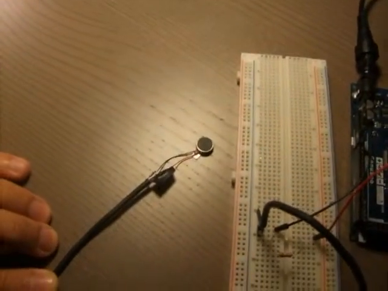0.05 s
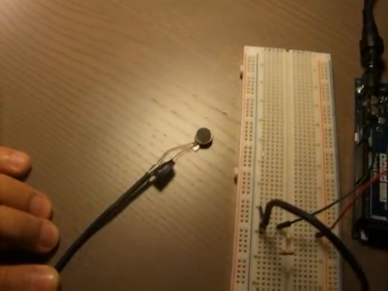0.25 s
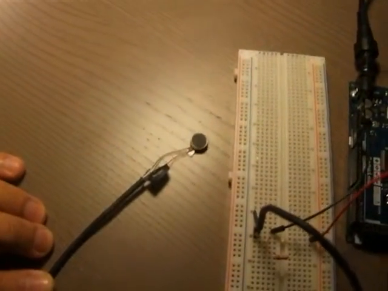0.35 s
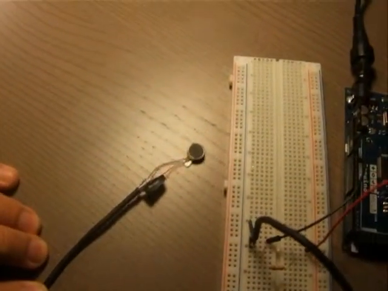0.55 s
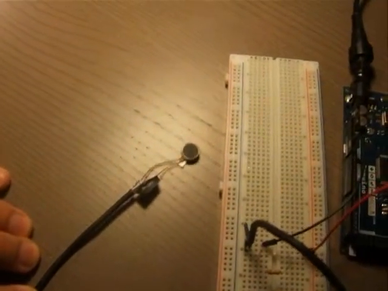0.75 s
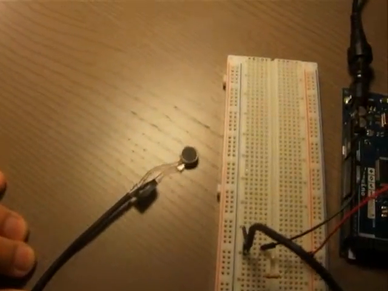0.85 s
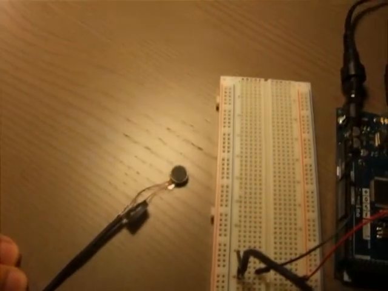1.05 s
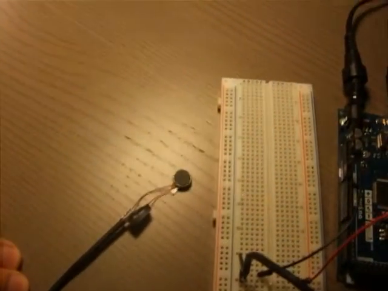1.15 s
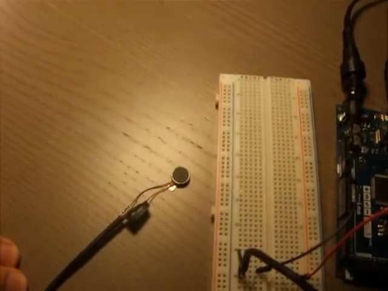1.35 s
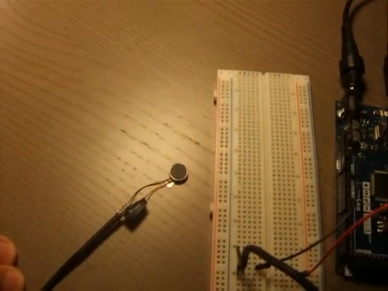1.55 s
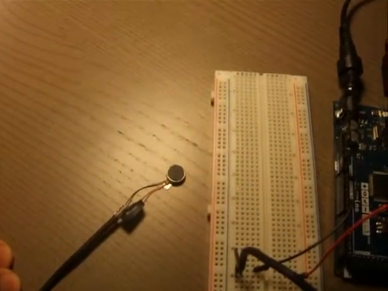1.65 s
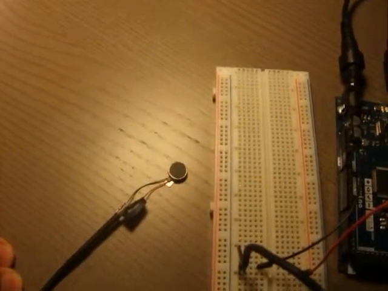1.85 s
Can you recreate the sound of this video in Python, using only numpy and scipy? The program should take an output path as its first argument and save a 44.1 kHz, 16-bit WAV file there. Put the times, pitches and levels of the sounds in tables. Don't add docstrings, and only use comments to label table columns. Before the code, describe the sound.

After a brief moment of gritty room hum, a coin-sized motor chatters hard against wood with sharp irregular clacks and fine scraping, cuts off abruptly, then two tiny stray ticks; close, dull, noisy mono sound.

```python
import sys
import numpy as np
from scipy import signal
from scipy.fft import rfft, irfft
from scipy.io import wavfile
from scipy.ndimage import uniform_filter1d

SR = 44100
rng = np.random.default_rng(int(sys.argv[2]) if len(sys.argv) > 2 else 0)


def waveform_to_disk(signal):
    frames = np.transpose(np.atleast_2d(signal))
    scaled = np.clip(frames, -1, 1) * 32767
    samples = np.round(scaled).astype(np.int16)
    wavfile.write(sys.argv[1], SR, samples)


def volts_from_decibels(level):
    exponent = np.asarray(level, float) / 20
    return 10 ** exponent


N = 83790
LEAD = 220


def over_frequency(freqs, points):
    hz, db = np.array(points).T
    return np.interp(np.log(freqs), np.log(hz), db)


def coloured(points, size):
    freqs = np.fft.rfftfreq(size, 1 / SR) + 1
    spectrum = rfft(rng.standard_normal(size)) * volts_from_decibels(over_frequency(freqs, points))
    noise = irfft(spectrum, size)
    return noise / noise.std()


def walk(rate):
    hold = int(SR / rate)
    steps = np.repeat(rng.standard_normal(N // hold + 1), hold)
    return 1.3 * uniform_filter1d(uniform_filter1d(steps, hold), hold)[:N]


def clicks(times, gains):
    return np.bincount(np.clip((times * SR).astype(int), 0, N - 1), gains, N)


# frequency in Hz, level in dB per Hz.
ROOM_COLOUR = [(25, -12), (60, -4.5), (150, -9.5), (300, -4), (600, -12.5), (1500, -14), (7000, -23.5)]
ROOM_TONE_DB, MAINS_HZ, MAINS_DB = -54.5, 119.4, -61.5


def room(t):
    hum_gain = np.sqrt(2) * volts_from_decibels(MAINS_DB + 1.0 * walk(8))
    hum = hum_gain * np.sin(2 * np.pi * MAINS_HZ * t + 0.6 * walk(10))
    return volts_from_decibels(ROOM_TONE_DB + 1.2 * walk(1)) * coloured(ROOM_COLOUR, N) + hum


# time in seconds, speed in turns per second (Hz), tap level in dB.
ROTOR = [(0.209, 116, -29), (0.299, 119.9, -27.5), (0.424, 125, -28.5), (0.519, 129, -29),
         (0.622, 136.5, -29), (0.7, 151.7, -30.5), (0.83, 156.3, -30.5), (0.94, 161.5, -30),
         (1.04, 174, -31), (1.202, 176.2, -32), (1.234, 171.8, -45), (1.271, 167.9, -44.5)]
SPIN_FADE_S, COAST_S = .05, .045


def rotor_spin(t):
    times, speeds, levels = np.array(ROTOR).T
    speed = np.interp(t, times, speeds)
    turns = np.cumsum(speed * (1 + 0.008 * walk(25))) / SR
    to_nearest_end = np.minimum(t - times[0], times[-1] + COAST_S - t)
    running = np.clip(to_nearest_end / SPIN_FADE_S, 0, 1)
    return speed, turns, running, np.interp(t, times, levels)


# multiple of the turning rate, level in dB at 160 Hz,
# growth with speed as a power.
WHIRR = [
    (1, -59.5, 4),
    (2, -56.5, 1.5),
]
WHIRR_FLUTTER_DB, WHIRR_WOBBLE_RAD = 2.5, .6
POWER_OFF_S = 1.19


def whirr(t, speed, turns, running):
    hum = 0
    for multiple, db, growth in WHIRR:
        gain = np.sqrt(2) * volts_from_decibels(db + WHIRR_FLUTTER_DB * walk(30)) * (speed / 160) ** growth
        hum = hum + gain * np.sin(2 * np.pi * multiple * turns + WHIRR_WOBBLE_RAD * walk(30))
    powered = np.clip(1 - (t - POWER_OFF_S) / SPIN_FADE_S, 0, 1)
    return running * powered * hum


ARRIVALS_S = [.0001, .00057, .0006, .0011, .0015, .0023, .0027, .0035, .0041, .0059, .0066, .0078, .0127,
              .0173, .0214]
POLARITY = [1, -1, -1, 1, 1, 1, -1, 1, 1, 1, 1, 1, 1, 1, 1]
# level in dB, ring in Hz, half length in seconds.
PATHS = [(-3, 6000, .00018), (-1, 3900, .00016), (-17, 950, .0012), (-6, 5900, .00015), (1, 4800, .00011),
         (-12, 4000, .0002), (-13, 3200, .0002), (-12, 5600, .0003), (-10, 1680, .0005), (-9, 4200, .00015),
         (-11, 4700, .0002), (-9, 5000, .00012), (-18, 3000, .0006), (-15, 6000, .0005), (-20, 4300, .0005)]


def direct_and_bounces(t):
    sound = 0
    for arrival, sign, (db, hz, half) in zip(ARRIVALS_S, POLARITY, PATHS):
        since = t - arrival
        sound = sound + sign * volts_from_decibels(db) * np.exp(-(since / half) ** 2) * np.cos(2 * np.pi * hz * since)
    return sound


# frequency in Hz, width in Hz, level in dB.
BOARD = [(947, 50, -6.5), (1540, 120, -5.5), (2411, 22, -4), (2940, 90, 0.5), (3403, 48, -5.5),
         (3640, 350, 0), (3680, 13, -11.5), (4060, 150, -5.5), (5000, 680, -26), (4290, 160, 0),
         (5580, 13, -11.5), (5056, 75, -12), (5885, 200, -7), (6310, 480, -17.5)]
BOARD_DB = -23.5


def board_ring(t):
    return sum(volts_from_decibels(BOARD_DB + db) * np.exp(-np.pi * width * t) * np.sin(2 * np.pi * (hz * t + rng.random()))
               for hz, width, db in BOARD)


# frequency in Hz, level in dB per Hz.
TAIL_COLOUR = [(300, -8), (640, -15.5), (800, -4), (1200, -6), (1400, -11), (1650, -7), (2100, -8),
               (4500, -15)]
SCATTER_DB, SCATTER_T60_S = -23.5, 0.096
ROOM_DB, ROOM_T60_S = -26.5, .35


def ring_out(t):
    fall = volts_from_decibels(SCATTER_DB - 60 * t / SCATTER_T60_S) + volts_from_decibels(ROOM_DB - 60 * t / ROOM_T60_S)
    return coloured(np.vstack([[(100, -46)], TAIL_COLOUR]), len(t)) * fall


# frequency in Hz, level in dB.
COLOUR = [(650, 2), (950, 0), (1400, 1.5), (1620, 5), (2100, -1), (3000, 3), (5000, 3), (6400, 2)]
EVENNESS = .55


def table_click(lifts):
    t = np.arange(-LEAD, SR // 2) / SR
    size = len(t)
    click = direct_and_bounces(t) + (board_ring(t) + ring_out(t)) * np.clip(t / 0.0018, 0, 1)
    freqs = np.fft.rfftfreq(size, 1 / SR) + 1
    power = np.abs(rfft(click)) ** 2 + 1e-9
    comb = uniform_filter1d(power, size=120) / uniform_filter1d(power, size=900)
    even = np.where(freqs > 2200, comb ** (-EVENNESS / 2), 1)
    lift_db = sum(db / (1 + (2 * (freqs - hz) / width) ** 2) for hz, width, db in lifts) - 2
    gain = even * volts_from_decibels(lift_db + over_frequency(freqs, COLOUR))
    cepstrum = irfft(np.log(gain), size)
    fold = np.r_[1, np.full(size // 2 - 1, 2), np.zeros(size - size // 2)]
    return irfft(rfft(click) * np.exp(rfft(cepstrum * fold)), size)


def strike(blows, lifts):
    return signal.fftconvolve(blows, table_click(lifts))[LEAD:N + LEAD]


# frequency in Hz, width in Hz, lift in dB.
BED = [(825, 250, 5), (960, 72, 6.5), (1266, 180, 6), (1655, 150, -5), (2370, 230, 5.5), (3298, 290, 3.5),
       (4694, 180, 1.5), (5620, 900, -3.5), (6930, 540, 2)]
TAP_JITTER, TAP_SCATTER_DB = .15, 3
RUB_PER_S, RUB_DB = 2000, -9.5


def taps_and_rub(t, turns, running, tap_db):
    at = t[1:][np.diff(np.floor(turns)) > 0]
    jitter, scatter = rng.standard_normal((2, len(at)))
    size = np.interp(at, t, running) * volts_from_decibels(np.interp(at, t, tap_db) + TAP_SCATTER_DB * np.tanh(scatter))
    taps = clicks(at + TAP_JITTER * jitter / 150, size)
    grit = rng.standard_normal(N) * (rng.random(N) < RUB_PER_S / SR)
    rub = grit * running * volts_from_decibels(tap_db + RUB_DB)
    return strike(taps + rub, BED)


# time in seconds, peak in dB.
LANDINGS = [(.2117, -27), (.2194, -25), (.2531, -20.5), (.2606, -15), (.2985, -25), (.3021, -12),
            (.3368, -10.5), (.3725, -27), (.3761, -13), (.4094, -10.5), (.4479, -15.5), (.4488, -17.5),
            (.4858, -19), (.4865, -24), (.5322, -21), (.533, -20), (.5774, -10.5), (.581, -21),
            (.6157, -18.5), (.6209, -12), (.6664, -22.5), (.6691, -10.5), (.6704, -18.5), (.7226, -11.5),
            (.7233, -20.5), (.7649, -27), (.7679, -10.5), (.8128, -10.5), (.8452, -13), (.8864, -28),
            (.889, -10), (.9292, -17.5), (.9336, -13), (.9807, -10.5), (1.0348, -10), (1.0626, -12),
            (1.1051, -28), (1.1076, -10.5), (1.1496, -23.5), (1.1524, -11.5), (1.2026, -20),
            (1.2051, -16.5), (1.2058, -23), (1.2457, -22), (1.2475, -21.5)]
# frequency in Hz, width in Hz, lift in dB.
CAN = [(1010, 110, -3), (1440, 80, -11), (1526, 140, -2), (1997, 180, -3.5), (2860, 320, 1.5),
       (4053, 250, 7), (4211, 140, -5), (4788, 240, 6), (5030, 240, -5.5), (5486, 250, 0.5), (6354, 340, 4),
       (7150, 1000, 4)]
LANDING_DB, SKITTER_DB, SKITTER_S = -1, -27, .004


def landings():
    times, peaks = np.array(LANDINGS).T
    delay, size = rng.standard_normal((2, len(times), 8))
    loose_at = times[:, None] + SKITTER_S * np.abs(delay)
    loose_gain = volts_from_decibels(peaks[:, None] + SKITTER_DB) * size
    skitter = clicks(loose_at.ravel(), loose_gain.ravel())
    return strike(clicks(times, volts_from_decibels(peaks + LANDING_DB)) + skitter, CAN)


def motor(t):
    speed, turns, running, tap_db = rotor_spin(t)
    return whirr(t, speed, turns, running) + taps_and_rub(t, turns, running, tap_db) + landings()


# time in seconds, level in dB, decay in seconds, lowest frequency in Hz.
CRACKS = [
    (1.7751, -33, .001, 2000),
    (1.8709, -34, .0009, 3600),
]


def cracks(t):
    sound = 0
    for start, db, tau, low_hz in CRACKS:
        highpass = signal.butter(2, low_hz, "high", fs=SR, output="sos")
        noise = signal.sosfilt(highpass, rng.standard_normal(N))
        sound = sound + volts_from_decibels(db) * (t > start) * np.exp(-np.maximum(t - start, 0) / tau) * noise
    return sound


def ring(t, hz, tau):
    u = np.maximum(t, 0) / tau
    return u * np.exp(1 - u) * np.cos(2 * np.pi * hz * (t - tau))


# time in seconds, peak in dB, ring in Hz, ring time in seconds,
# click level in dB.
TICKS = [
    (1.7752, -39, 600, .0022, -38),
    (1.7753, -43, 760, .0018, -44),
    (1.7754, -43, 1400, .0015, -42),
    (1.7754, -45, 2900, .0008, -46),
    (1.8710, -41.5, 3500, .0016, -33),
    (1.8714, -46, 4600, .0005, -40),
]


def ticks(t):
    sound = 0
    for start, db, hz, tau, click_db in TICKS:
        since = t - start
        body = volts_from_decibels(db) * ring(since, hz, tau / 4) + volts_from_decibels(db - 2.5) * ring(since, hz * 1.03, tau)
        click = ring(since, 5400, .00012) + ring(since - .0007, 6500, .00012)
        sound = sound + body + volts_from_decibels(click_db) * click
    return sound


def scene():
    t = np.arange(N) / SR
    return (room(t) + motor(t) + cracks(t) + ticks(t))[None]


def top_cut(x):
    return signal.sosfilt(signal.butter(12, 7890, fs=SR, output="sos"), x)


HISS_DB, OFFSET, EDGE_HZ = -56.5, 0.00077, 6840
STEP = 1 / 128


def record(dry):
    low = signal.resample_poly(dry[0], 160, 441)
    pair = low + OFFSET + volts_from_decibels(HISS_DB) * rng.standard_normal((2, len(low)))
    mono = np.floor(pair / STEP).mean(axis=0) * STEP
    up = signal.resample_poly(mono, 441, 160, padtype="mean")[:N]
    soft = signal.sosfiltfilt(signal.butter(14, EDGE_HZ, fs=SR, output="sos"), up)
    return top_cut(soft[None])


dry = scene()
out = record(dry)
waveform_to_disk(out)
```